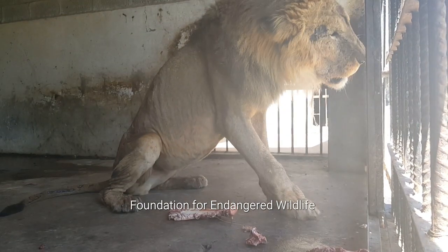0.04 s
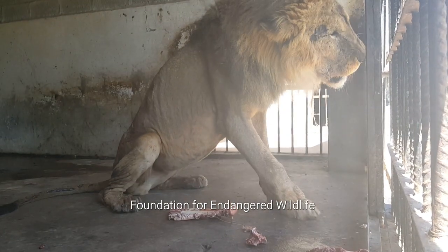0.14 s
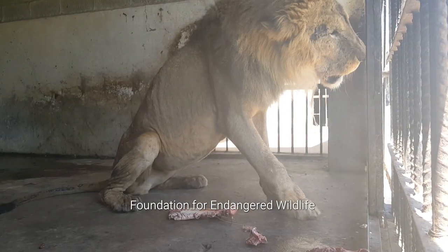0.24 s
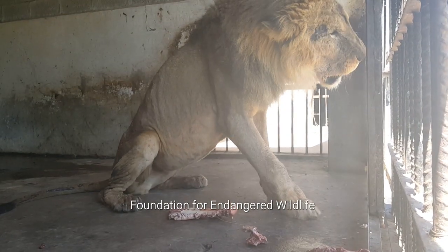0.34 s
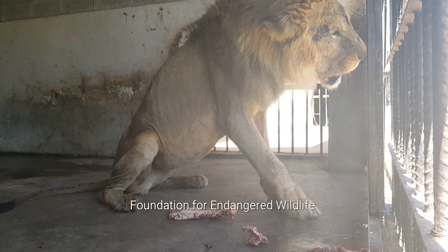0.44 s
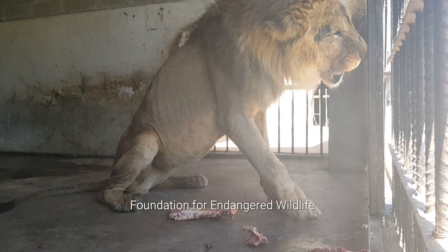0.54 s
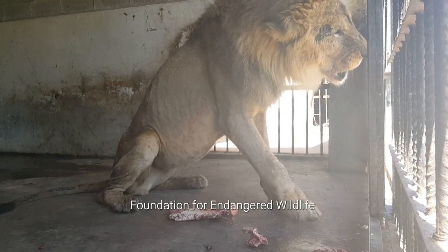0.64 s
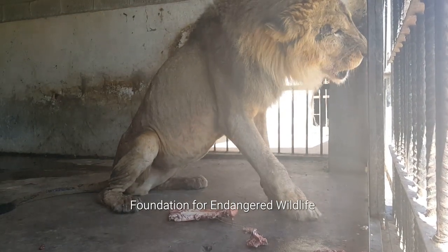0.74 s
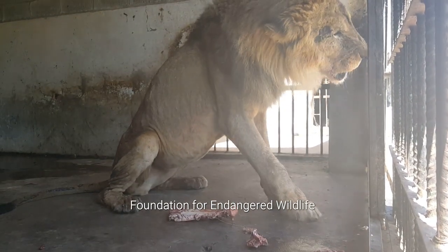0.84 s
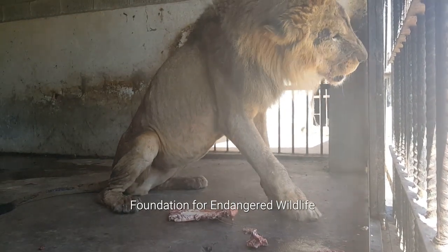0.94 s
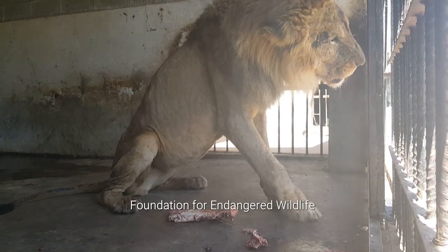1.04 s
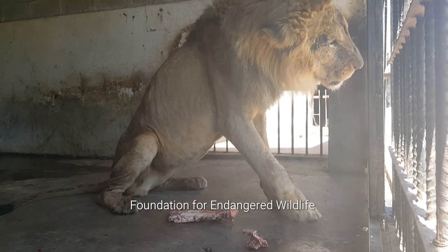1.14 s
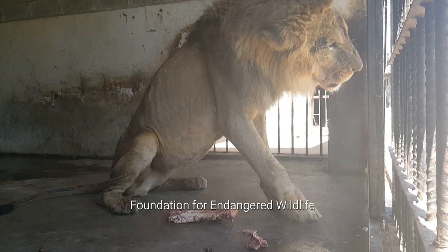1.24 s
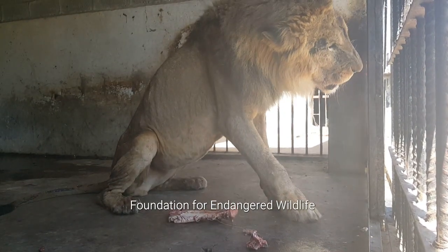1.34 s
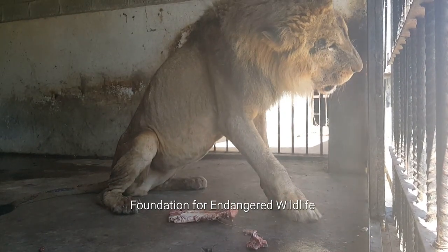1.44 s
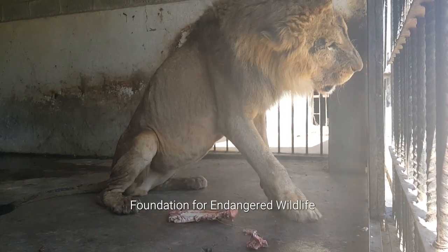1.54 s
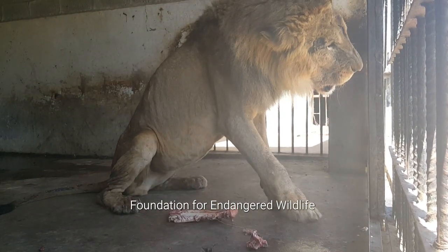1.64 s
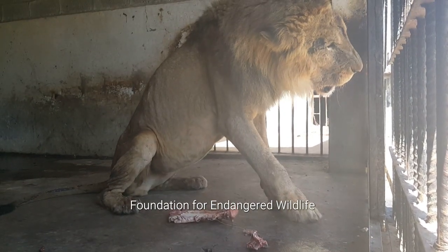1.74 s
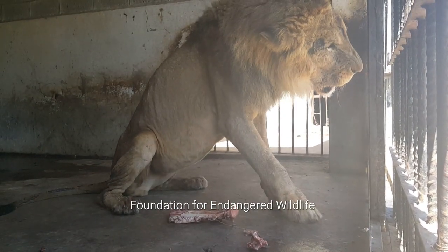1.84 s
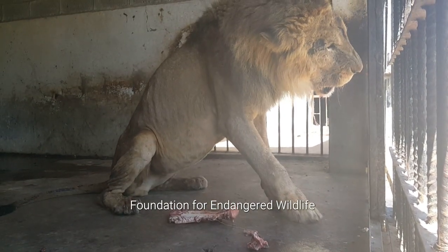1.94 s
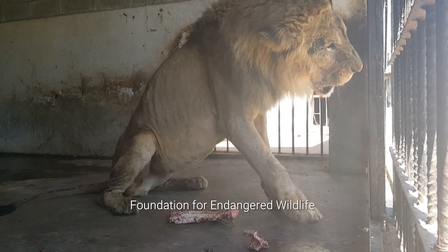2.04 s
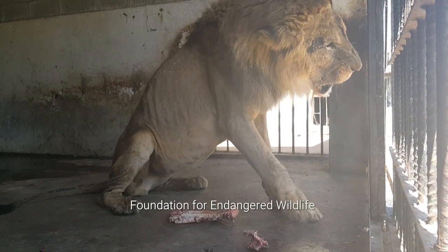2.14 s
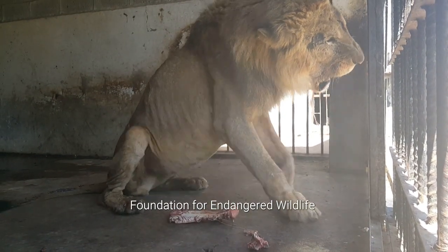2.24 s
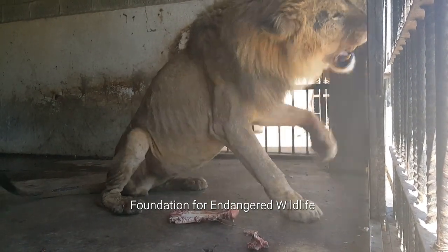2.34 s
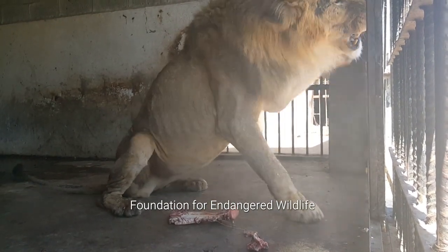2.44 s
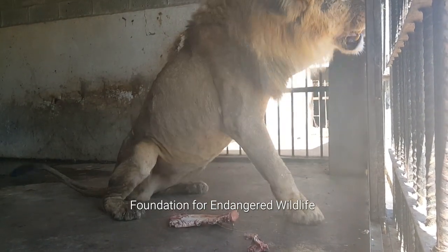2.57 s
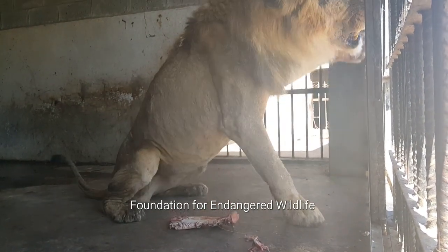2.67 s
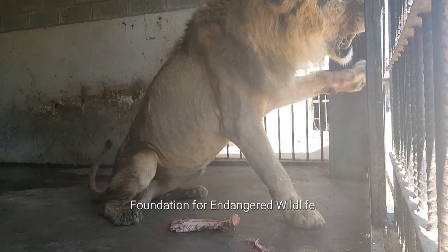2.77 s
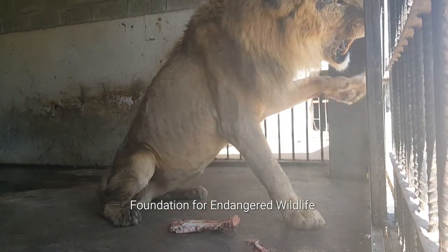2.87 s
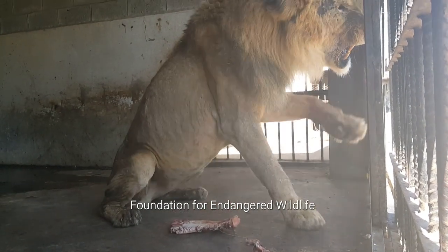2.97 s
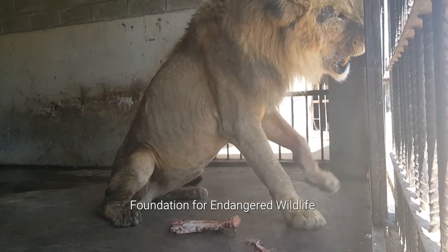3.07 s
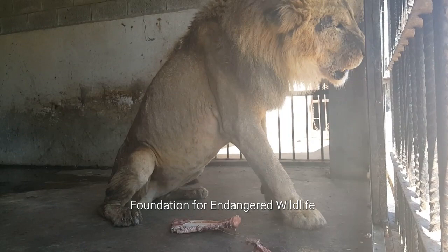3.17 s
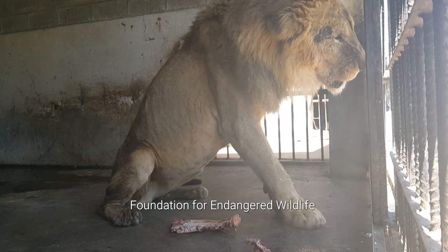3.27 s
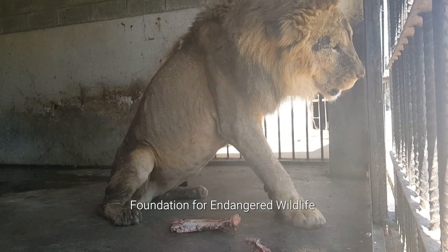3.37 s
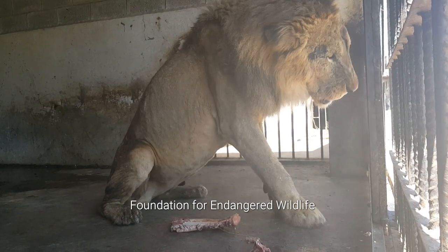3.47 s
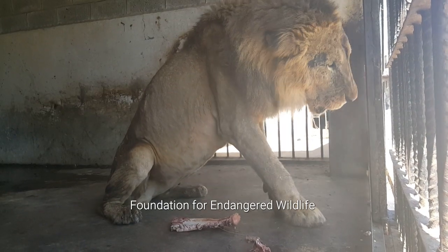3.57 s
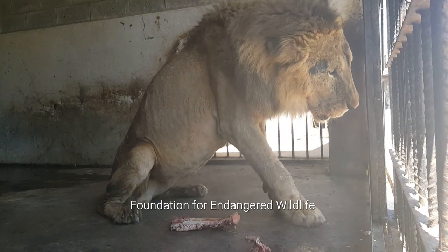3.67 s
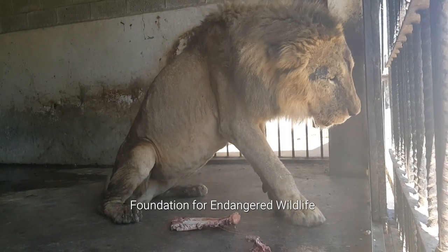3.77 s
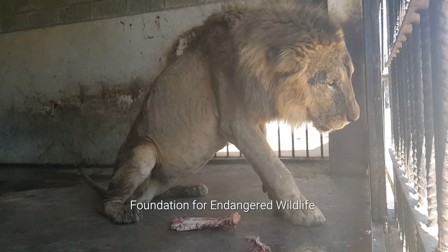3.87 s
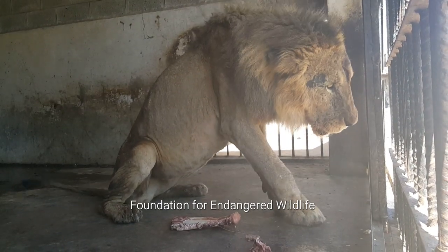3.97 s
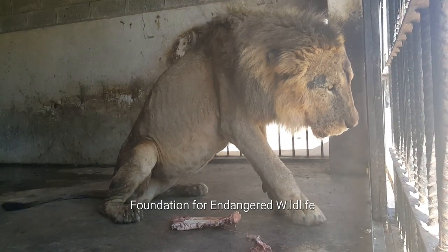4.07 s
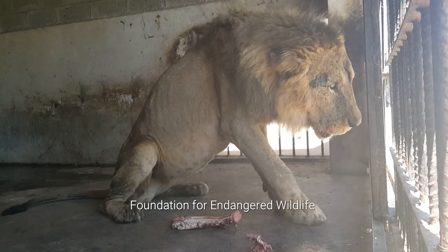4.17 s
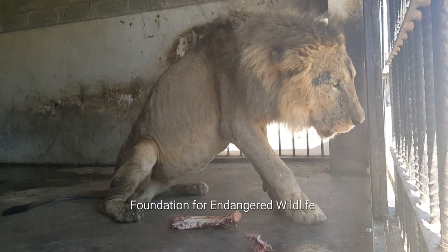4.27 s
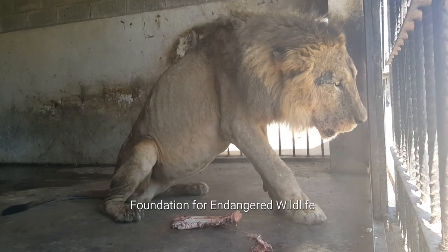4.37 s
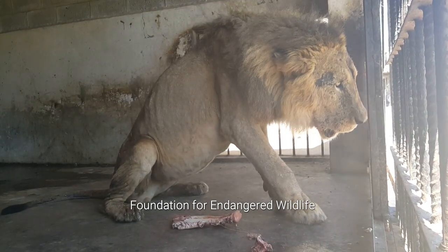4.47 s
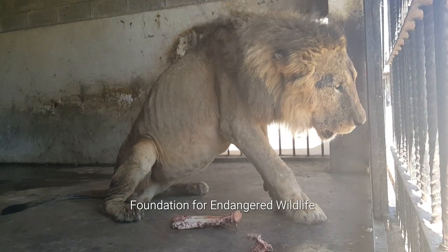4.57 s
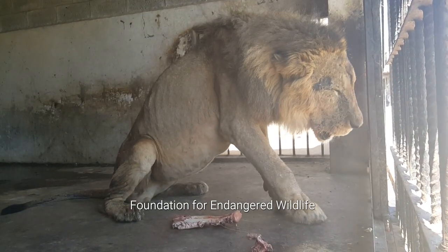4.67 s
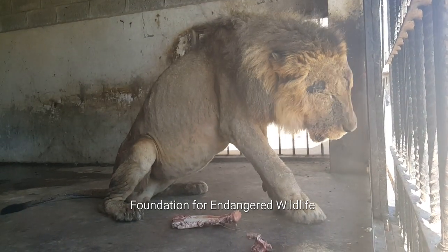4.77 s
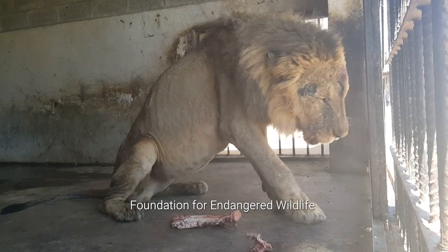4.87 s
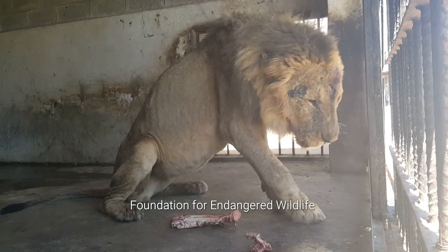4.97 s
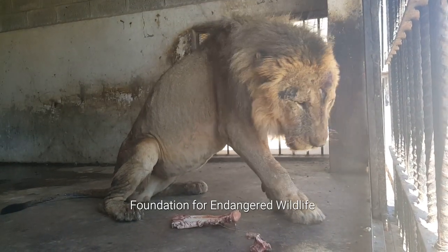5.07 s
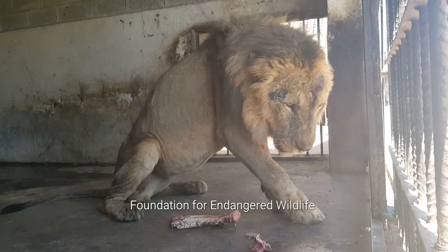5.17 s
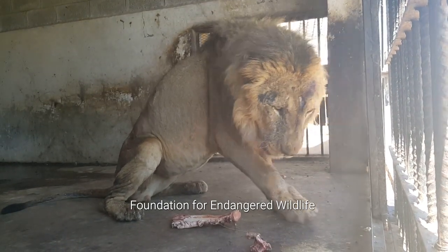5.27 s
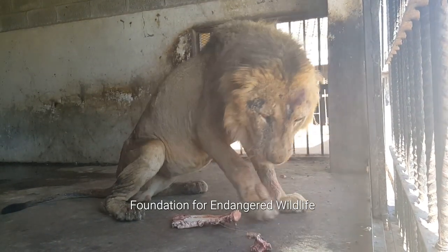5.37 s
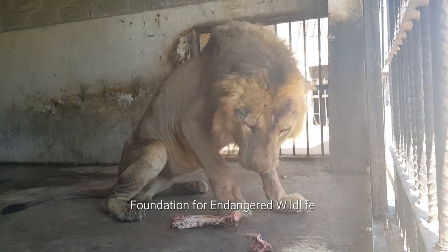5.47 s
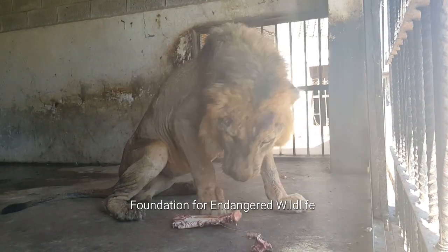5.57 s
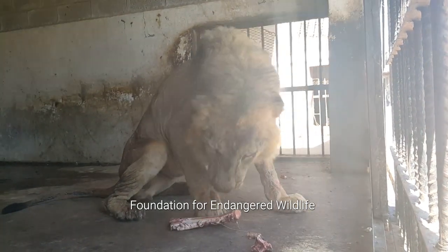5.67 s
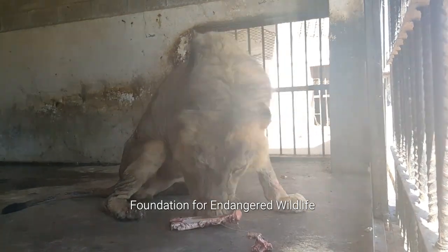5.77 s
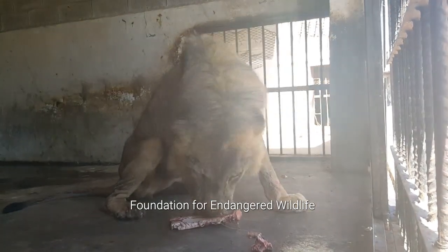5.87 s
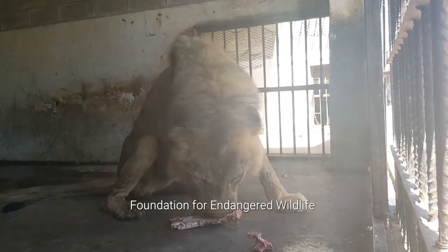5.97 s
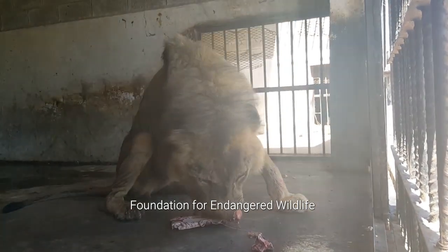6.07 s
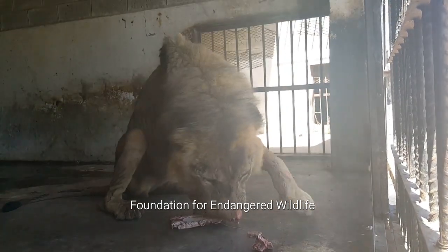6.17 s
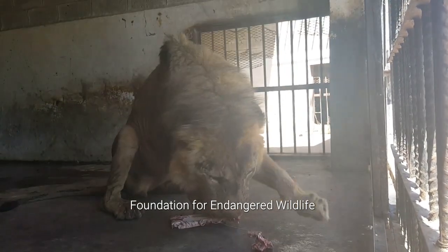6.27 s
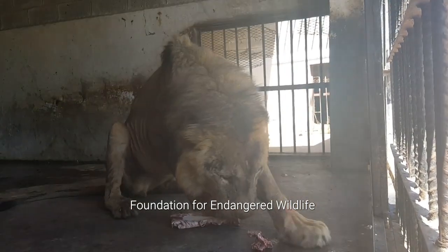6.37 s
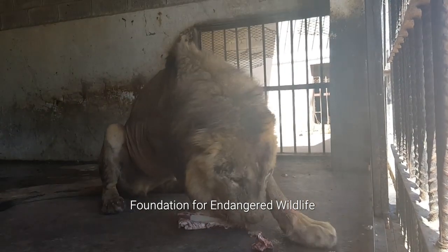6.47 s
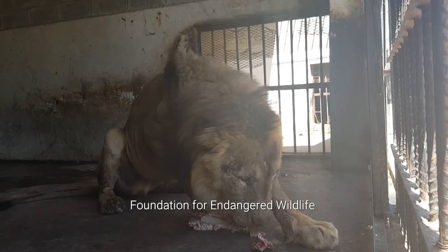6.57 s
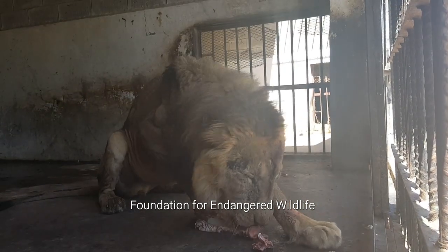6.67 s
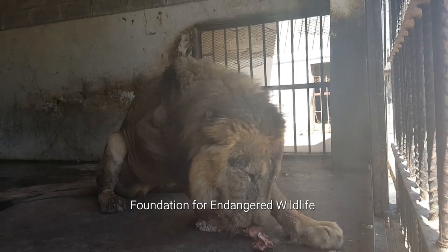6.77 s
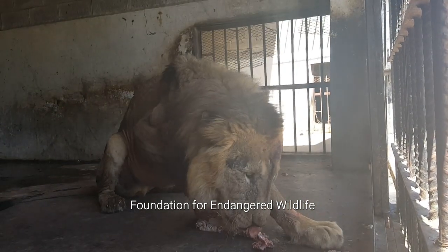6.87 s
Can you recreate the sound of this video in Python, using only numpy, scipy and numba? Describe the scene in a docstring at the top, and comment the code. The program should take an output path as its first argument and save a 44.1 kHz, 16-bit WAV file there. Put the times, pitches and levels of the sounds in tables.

```python
"""A low outdoor murmur is heard first and runs throughout; over it a lion, a couple of metres away, roars four
times in a small concrete cell. Its slack vocal folds slap about 17 to 46 times a second, and slaps and rushing
air ring chest, throat and mouth. Air swells once in every roar, the chest resonance sinks, and a smooth moan
appears inside the third roar. Sharp hisses are bursts of shaped noise, dry ticks are short grains of noise with a
brief ring, and a huff leads into the second roar. The cell adds standing waves, hard reflections and a tail."""
import sys
import numpy as np
from scipy import signal
from scipy.fft import rfft, irfft
from scipy.io import wavfile
from scipy.ndimage import uniform_filter1d
from numba import njit

SR = 44100
rng = np.random.default_rng(int(sys.argv[2]) if len(sys.argv) > 2 else 0)


def waveform_to_disk(signal):
    """Save audio, clipped to [-1, 1], as 16-bit WAV at the path in sys.argv[1]."""
    frames = np.transpose(np.atleast_2d(signal))
    scaled = np.clip(frames, -1, 1) * 32767
    samples = np.round(scaled).astype(np.int16)
    wavfile.write(sys.argv[1], SR, samples)


N = 304788  # length in samples


def undb(db):
    """Turn decibels into gain."""
    return 10 ** (np.asarray(db) / 20)


def clock():
    """Time of every sample in seconds."""
    return np.arange(N) / SR


def curves(rows):
    """Join each column of a table by straight lines in time; the first column is the time."""
    s, *columns = np.transpose(rows)
    return [np.interp(clock(), s, column) for column in columns]


def ramp(age, length_s):
    """Rise from 0 to 1 in length_s."""
    return np.clip(age / length_s, 0, 1)


def unit(x):
    """Scale to rms 1."""
    return x / np.sqrt(np.mean(x ** 2))


def steady(x, size=2600):
    """Hold the rms near 1 over a few slaps, leaving the single slaps standing."""
    power = uniform_filter1d(uniform_filter1d(x ** 2, size), size)
    floor = 1e-5 * np.mean(x ** 2)  # keeps silence from being blown up
    return x / np.sqrt(np.abs(power) + floor)


def pan(x, db):
    """Place a sound by its left minus right level."""
    return x * undb(np.array([[db], [-db]]) / 2)


def walk(rate, count=2000):
    """Slow chance: random levels, rate of them a second, joined by lines and scaled to rms 1."""
    return unit(np.interp(clock() * rate, np.arange(count), rng.standard_normal(count)))


def colour(x, points):
    """Give a sound a spectrum of (Hz, dB) points."""
    hz, db = np.transpose(points)
    f = np.fft.rfftfreq(x.shape[-1], 1 / SR)
    gain = undb(np.interp(np.log(f + 1), np.log(hz), db))
    return irfft(rfft(x) * gain, x.shape[-1])


@njit
def svf(x, hz, width):
    """State-variable band-pass with a moving centre, gain 1 there."""
    y, b, l = np.empty(len(x)), 0., 0.
    for i in range(len(x)):
        g, k = np.tan(np.pi * hz[i] / SR), width / hz[i]
        v = (b + g * (x[i] + 1e-18 - l)) / (1 + g * (g + k))
        b, l, y[i] = 2 * v - b, l + 2 * g * v, k * v
    return y


def ring(x, hz, width_hz, order=1):
    """A resonance; applied several times it has steeper skirts."""
    for _ in range(order):
        x = svf(x, hz + np.zeros(len(x)), float(width_hz))
    return x


def muffle(x, hz, order=6):
    """A low-pass: the part above hz is swallowed, as by soft tissue."""
    return signal.sosfilt(signal.butter(order, hz, fs=SR, output="sos"), x)


# Colour of the outdoor murmur. Each row: pitch in Hz, level in dB.
MURMUR_COLOUR = [(15, -55.5), (25, -12), (53, -22), (71, 4.5), (222, 0.5), (297, -2.5), (349, -4),
                 (455, -2.5), (520, -12), (627, -11), (840, -17.5), (1220, -19), (2940, -32), (4620, -36),
                 (9500, -44.5), (14500, -53)]
MURMUR_DB = -41.5  # rms of the part that both sides share


def ambience():
    """A low outdoor murmur of air through the bars, all the way through; the bass is nearly alike on both sides."""
    mid, side = colour(rng.standard_normal((2, N)), MURMUR_COLOUR) * undb(1.0 * walk(6.3))
    side = colour(side, [(100, -18.5), (500, -3.0), (2000, 0.5)])
    return (mid + side * np.array([[1], [-1]])) * undb(MURMUR_DB) / np.std(mid)


# Standing waves of the cell. Each row: pitch in Hz, width in Hz, level in dB.
STANDING_WAVES = [(77.5, 11.4, 4), (124.6, 6.3, 5.5), (212, 25, 3.5), (403.6, 7.9, 6.5), (539, 7, 0.5)]
# First reflections. Each row: delay to the left port in s, delay to the right port in s, gain.
REFLECTIONS = [(.0031, .0033, .3), (.0071, .0068, .33), (.0129, .0133, .22)]
# Colour of the diffuse tail, before its overall level. Each row: pitch in Hz, level in dB.
REVERB_COLOUR = [(100, 3.5), (250, 7.5), (500, 14), (1200, 5), (3000, 5), (9000, 5.5), (15000, -49)]


def cell(dry, t60_s=0.54, tail_db=-3.5):
    """Bare concrete: standing waves, a few hard reflections and a diffuse tail with lows nearly alike on both sides."""
    t = np.arange(SR) / SR
    mid, side = rng.standard_normal((2, SR))
    side = colour(side, [(120, -10.0), (280, -23.0), (600, -1.5)])
    tail = mid + side * np.array([[1], [-1]])
    fade = undb(-60 * t / t60_s) * (1 - np.exp(-t / 0.0016))
    tail = unit(tail * fade) / np.sqrt(SR)
    response = colour(tail, REVERB_COLOUR) * undb(tail_db) * (t < .9)
    direct = np.eye(1, SR)[0]  # a single click at time 0
    response += direct + sum(undb(db) * ring(direct, hz, width) for hz, width, db in STANDING_WAVES)
    for left, right, gain in REFLECTIONS:
        response[[0, 1], [int(left * SR), int(right * SR)]] += gain
    return signal.fftconvolve(dry, response, axes=1)[:, :N]


# Dry ticks of the jaws, claws and around the bone.
# Each row: start in s, relative level in dB, left minus right in dB.
TICK_TIMES = [(2.021, -42, -10), (2.251, -38, -9), (2.285, -33, -10), (2.328, -35, -7),
              (6.0947, -25.5, -10.5), (6.1228, -38.5, -1.5), (6.1449, -35.5, -5.5), (6.158, -39, 0),
              (6.173, -41, 3), (6.2487, -41.5, -6.5), (6.2722, -27.5, -5)]
# Short ring of every tick. Each row: pitch in Hz, width in Hz, level in dB.
TICK_RINGS = [(1950, 300, 8.5), (2314, 1130, 14.5), (2750, 540, 8.5), (3440, 2040, 7), (4700, 2300, -4.5)]


def ticks(scrape_s=0.0017):
    """Hard, gritty little contacts: quickly fading noise with a very short ring."""
    out, t, grit = 0, clock(), rng.standard_normal(N)
    for s, db, pan_db in TICK_TIMES:
        tap = grit * np.exp(-np.abs(t - s) / scrape_s) * (t >= s)
        out = out + pan(tap * undb(db + 4.5), pan_db)
    rung = np.array([sum(undb(db) * ring(side, hz, width, order=3) for hz, width, db in TICK_RINGS)
                     for side in out])
    return muffle(rung, 5500, order=3)


# Sharp bursts of hiss. Each row: start in s, level of the first spit in dB, left minus right in dB,
# level of the hiss after it in dB, length of that hiss in s.
HISS_BURSTS = [(2.371, -29, -6, -50, 0.15), (2.584, -22.5, -8, -40.5, 0.023),
               (3.917, -58, -1.5, -39.5, 0.11), (4.104, -34, -1.5, -41.5, 0.13),
               (4.462, -44, -12, -68, 0.068), (4.527, -44.5, -1.5, -49.5, 0.16),
               (5.076, -35, -1, -45.5, 0.17)]
# Colour of the bursts, before the top is softened. Each row: pitch in Hz, level in dB.
HISS_SPECTRUM = [(880, -8), (1500, -5.5), (2070, -4), (3460, -11), (4340, -7.5), (6660, -19), (8770, -19),
                 (10100, -30), (14500, -29)]


def hisses():
    """Each burst of noise spits once, then hisses on and dies."""
    out, t = 0, clock()
    noise = colour(rng.standard_normal(N), HISS_SPECTRUM)
    noise = unit(colour(noise, [(9500, 0), (13000, -8)])) * undb(1.5 * walk(120))
    for s, spit_db, pan_db, hiss_db, length in HISS_BURSTS:
        age = np.maximum(t - s, 0)
        shape = undb(spit_db) * np.exp(-age / 0.004) + undb(hiss_db) * np.exp(-(age / length) ** 2)
        out = out + pan(noise * shape * (t >= s), pan_db)
    return out


def huff(peak_s=2.26, rise_s=0.091, throat_db=-42, mouth_db=-45, hiss_db=-47):
    """Air hisses through the opening jaws; just before the second roar, throat and mouth join in."""
    air = rng.standard_normal(N) * undb(2.5 * walk(60))
    early = peak_s - clock()
    swell = np.exp(-np.maximum(early, 0) / rise_s) * (1 + early / 0.87).clip(0, 1)
    throat = undb(throat_db) * unit(ring(air, 450, 330, order=2))
    mouth = undb(mouth_db) * unit(ring(air, 1350, 580, order=2))
    hiss = unit(colour(air, [(1000, -36), (2500, -19), (5000, -11.0), (7000, -21), (14000, -31.5)]))
    return (throat + mouth) * swell ** 2 + undb(hiss_db) * hiss * swell


# Slap rate of the vocal folds, one list per roar, from its start to its end.
# Each row: time in s, slaps per second.
SLAP_RATES = [
    [(.438, 45.8), (.47, 40.7), (.55, 31), (.98, 29.1), (1.08, 24.8), (1.36, 23.7), (1.48, 17.5),
     (1.62, 26)],
    [(2.363, 42.3), (2.42, 43.2), (2.6, 37), (2.87, 35.9), (3.13, 27.6), (3.27, 31.3), (3.39, 26.3),
     (3.53, 28.7), (3.65, 26.3), (3.74, 29.3), (4.0, 28.2), (4.09, 20.5), (4.3, 21.3)],
    [(4.737, 27.8), (4.8, 29.4), (4.95, 33.1), (5.18, 26.6), (5.26, 33.2), (5.58, 28.9), (5.7, 26.3),
     (5.86, 30)],
    [(6.188, 31.2), (6.26, 35.9), (6.44, 36.4), (6.61, 30), (6.69, 32), (6.77, 27.8), (7.0, 34)],
]


def folds(jitter_s=.0003, scatter_db=3.0):
    """Uneven slaps of the vocal folds at a changing rate, and soft rebounds between them."""
    t, slaps, rebounds = clock(), np.zeros(N), np.zeros(N)
    for roar in SLAP_RATES:
        (rate,) = curves(roar)
        cycles = np.cumsum(rate * ((t >= roar[0][0]) & (t < roar[-1][0]))) / SR
        # one slap whenever the count of cycles reaches a whole number
        at = np.searchsorted(cycles, np.arange(int(cycles[-1]) + 1), side="right").clip(0, N - 1)
        late, size, second = rng.standard_normal((len(at), 3)).T
        again = at + rng.uniform(0.217, .7, len(at)) * SR / rate[at]
        slap_at = (at + np.abs(late) * jitter_s * SR).astype(int).clip(0, N - 1)
        slaps[slap_at] = undb(scatter_db * size)
        rebounds[again.astype(int).clip(0, N - 1)] = np.abs(second)
    return slaps, rebounds


def puffs(slaps, decay_s):
    """A short puff of turbulence after every slap."""
    fading = signal.lfilter([1], [1, -np.exp(-1 / (decay_s * SR))], slaps)
    return steady(fading * rng.standard_normal(N))


def attacks(slaps):
    """What a slap sounds like before anything rings: a pressure thump and a gritty crack."""
    thump = steady(muffle(ring(slaps, 260, 840), 800, order=4))
    grit = steady(slaps) + 2 * puffs(slaps, decay_s=0.0017)
    crack = steady(muffle(ring(grit, 970, 2000, order=3), 2700))
    return thump, crack


# Snarls of air through bared teeth. Each row: peak time in s, rise in s, fall in s, relative level in dB.
SNARL_SWELLS = [(0.63, 0.19, 0.16, -39), (2.551, 0.11, 0.22, -32.5), (4.88, 0.066, 0.075, -51),
                (6.499, 0.088, 0.049, -38)]
GROWL_AIR, SNARL_AIR = .04, .42  # share of rushing air in the voice, 0-1, between and at the peaks of snarls


def snarls():
    """Air swells and ebbs once in every roar; gives its share of the voice and its gain."""
    t, swell, gain = clock(), 0, 0
    for peak_s, rise_s, fall_s, db in SNARL_SWELLS:
        shape = np.exp(-((t - peak_s) / np.where(t < peak_s, rise_s, fall_s)) ** 2)
        swell, gain = swell + shape, gain + undb(db) * shape
    return np.clip(GROWL_AIR + (SNARL_AIR - GROWL_AIR) * swell, 0, 1), gain


# Strain of the chest, one row per roar.
# Each row: time at full strain in s, strained chest pitch in Hz, relaxed chest pitch in Hz.
CHEST_STRAINS = [(0.072, 145, 104), (0.69, 220, 114), (0.069, 135, 127.6), (0.27, 140, 134)]
RELAX_S = 0.06  # time the chest resonance takes to sink


def strain():
    """Each roar holds the chest resonance high, then lets it sink."""
    t, starts = clock(), np.array([roar[0][0] for roar in SLAP_RATES])
    which = np.maximum(np.searchsorted(starts, t, side="right") - 1, 0)
    hold_s, strained_hz, relaxed_hz = np.array(CHEST_STRAINS)[which].T
    return strained_hz + (relaxed_hz - strained_hz) * ramp(t - starts[which] - hold_s, RELAX_S)


MOAN_PEAK_S, MOAN_HALF_LENGTH_S, MOAN_HZ = 5.125, 0.18, 86.4  # inside the third roar


def moan(pitch):
    """The folds lock into a smooth tone of three harmonics with a wavering pitch."""
    phase = 2 * np.pi * np.cumsum(pitch * (1 + 0.013 * walk(43))) / SR
    return unit(np.sin(phase) + undb(4.5) * np.sin(2 * phase) + undb(-21.5) * np.sin(3 * phase))


# Two fixed resonances beside the main one of the chest, relative to it.
# Each row: time in s, deep boom in dB, hollow overtone in dB.
CHEST_SIDES = [(.47, 3.5, 5), (.7, -10, -4), (2.5, -8.5, -39.5), (2.95, -1.5, 4), (3.2, -2.5, -14),
               (3.5, -4.5, -17), (4.15, -29.5, -26.5), (4.75, -7, -38), (5.2, 9, -20), (5.33, -23, -29),
               (6.2, -15, -15), (6.5, -9.5, -3.5), (6.75, -24, -13)]


def chest_sound(low):
    """The chest rings at its strained pitch with a boom and an overtone; the moan replaces it for a moment."""
    boom_db, hollow_db = curves(CHEST_SIDES)
    main = ring(low, strain(), 92.0, order=2)
    boom = undb(boom_db) * ring(low, 91.4, 80, order=2)
    hollow = undb(hollow_db) * ring(low, 210.3, 44, order=2)
    no_rumble = signal.butter(3, 55, "high", fs=SR, output="sos")
    chest = steady(signal.sosfilt(no_rumble, main + boom + hollow))
    smooth = np.clip(1 - ((clock() - MOAN_PEAK_S) / MOAN_HALF_LENGTH_S) ** 2, 0, 1)
    return np.sqrt(1 - smooth) * chest + np.sqrt(smooth) * undb(-0.5) * moan(MOAN_HZ)


# The two throat resonances, moved by tongue and jaw.
# Each row: time in s, lower pitch in Hz, upper pitch in Hz, upper over lower in dB.
THROAT_SHAPES = [(.45, 428, 574, -9), (.56, 408, 597, -3), (1.2, 407, 549, -14), (2.4, 420, 615, -4.5),
                 (2.72, 354, 446, -2.5), (2.95, 377, 586, -2), (3.3, 405, 515, -5), (3.55, 391, 530, -4.5),
                 (3.8, 399, 510, 0.5), (4.04, 390, 452, -3.5), (4.78, 415.5, 536, -5),
                 (4.95, 427, 536, -10), (5.35, 340, 463, -10.5), (6.5, 340, 441, -0.5)]
THROAT_FLUTTER = .13  # pitch shake as a share of the pitch, scaled by the air share and the chest gain


def throat_sound(low, air, chest_db):
    """Two moving throat resonances, shaken by rushing air and muffled by soft tissue."""
    lower_hz, upper_hz, upper_db = curves(THROAT_SHAPES)
    depth = THROAT_FLUTTER * air * undb(chest_db - chest_db.max())
    lower_hz, upper_hz = (hz * (1 + depth * walk(60)) for hz in (lower_hz, upper_hz))
    lower = ring(low, lower_hz, 135, order=2)
    upper = undb(upper_db) * ring(low, upper_hz, 80, order=2)
    return muffle(steady(lower + upper), 768)


def mouth_sound(high, mouth_hz, lips_hz, lips_db):
    """The mouth and the lips ring as two moving resonances."""
    mouth = ring(high, mouth_hz, 160, order=2)
    lips = undb(lips_db) * ring(high, lips_hz, 230, order=2)
    return steady(muffle(mouth + lips, 2070))


def rasp_sound(high, wind, air, teeth_hz):
    """Air rasps past the teeth; through a wide-open mouth it also rushes as a broad hiss."""
    teeth = ring(high, teeth_hz * (1 + 0.022 * walk(25)), 560, order=3)
    above = undb(-16.5) * ring(high, 1.78 * teeth_hz, 2100, order=3)
    rush = unit(colour(wind, [(900, -31.0), (1500, 5.0), (2300, 1), (3300, -8.5), (5000, -13.5),
                              (9000, -20.5), (11000, -44)]))
    return steady(steady(teeth + above) + 9 * (air - GROWL_AIR) * rush)


# Narrow, whistling resonances of the airway. Each row: start in s, length in s, pitch in Hz, relative level in dB.
WHISTLE_NOTES = [(0.945, 0.15, 1164, -44.5), (1.335, 0.16, 1156, -54.5), (2.59, 0.13, 1070, -37),
                 (2.788, 0.21, 1187, -29), (3.686, 0.56, 863, -43), (5.279, 0.37, 882, -46)]
WHISTLE_EDGE_S, WHISTLE_FADE_DB_PER_S = 0.019, 29.5


def whistles(breath, width_hz=44):
    """The slaps and air set a narrow passage singing for a moment; it fades."""
    out, t = 0, clock()
    for start, length, hz, db in WHISTLE_NOTES:
        age = np.clip(t - start, 0, length)
        shape = ramp(age, WHISTLE_EDGE_S) * ramp(length - age, WHISTLE_EDGE_S)
        gain = undb(db + 6.5 - WHISTLE_FADE_DB_PER_S * age)
        out = out + steady(ring(breath, hz, width_hz, order=2)) * shape * gain
    return out


# Single slaps that stand out of the rattle.
# Each row: time in s, relative level of the thump in dB, relative level of the knock in the mouth in dB.
SLAMS = [(0.4384, -14, -22), (0.4685, -7.5, -29), (0.4835, -14.5, -15), (1.088, -28, -38),
         (1.421, -28, -41), (2.387, -10, -21), (2.4101, -2.5, -19.5), (2.4554, -11, -10),
         (2.4798, -8, -9.5), (2.528, -5.5, -11.5), (2.692, -13.5, -14.5), (2.718, -15, -20),
         (2.798, -11, -17.5), (2.909, -8.5, -18), (2.970, -17, -17), (3.003, -21, -19),
         (3.2442, -25.5, -21), (3.341, -21.5, -19), (3.452, -20.5, -20.5), (3.486, -24.5, -17.5),
         (3.523, -21.5, -15.5), (3.558, -19, -16.5), (3.631, -19, -20.5), (3.667, -14.5, -21),
         (4.737, -17.5, -27.5), (4.7725, -15.5, -26), (5.33, -26, -33), (5.3605, -35.5, -28),
         (6.2182, -23.5, -37.5), (6.303, -19, -34), (6.332, -30.5, -32), (6.442, -25.5, -27),
         (6.471, -21.5, -20), (6.4823, -29.5, -21.5), (6.499, -28, -22), (6.623, -21.5, -24.5),
         (6.654, -20, -32.5), (6.719, -30, -31.5), (6.79, -30, -26)]


def hard_slaps(mouth_hz, lips_hz, teeth_hz):
    """Now and then the folds slam shut: one clean pressure spike, and a knock that rings the mouth."""
    s, thump_db, knock_db = np.transpose(SLAMS)
    spikes, knocks, at = np.zeros(N), np.zeros(N), (s * SR).astype(int)
    spikes[at], knocks[at] = undb(thump_db), undb(knock_db)
    thump = muffle(ring(spikes, 290, 750, order=2), 850, order=3)
    knock = (ring(knocks, mouth_hz, 165, order=2) + undb(-4.5) * ring(knocks, lips_hz, 280, order=2)
             + undb(-23) * ring(knocks, teeth_hz, 700, order=2)
             + undb(-21.5) * ring(knocks, 1300, 2500, order=2))
    knock = muffle(knock, 3000, order=4)
    # the filters lower the peaks; bring the loudest back up
    thump = thump * spikes.max() / np.abs(thump).max() * undb(-2.5)
    return thump + knock * knocks.max() / np.abs(knock).max() * 1.6


def closure(lead_s=.004, length_s=.009, depth=.75):
    """Around a hard slap the folds stay shut while the pressure builds, and the upper rattle dips."""
    t = clock()
    shut = sum(np.exp(-((t - s + lead_s) / length_s) ** 2) for s, _, _ in SLAMS)
    return 1 - depth * shut.clip(0, 1)


# Levels of the three main resonances, one list per roar.
# Each row: time in s, then relative levels of chest, throat and mouth in dB.
VOICE_LEVELS = [
    [(.44, -25.5, -12.5, -28.5), (.49, -22.5, -15.5, -28), (.56, -34.5, -29.5, -37), (.69, -33, -37, -38.5),
     (.85, -24.5, -52, -50), (1.0, -26, -34.5, -46), (1.2, -31.5, -40.5, -54), (1.48, -33.5, -34, -54.5),
     (1.6, -50, -71, -97)],
    [(2.36, -11.5, -20, -25), (2.39, -14, -24.5, -19.5), (2.52, -8, -23.5, -28), (2.72, -15.5, -21.5, -27),
     (2.85, -19, -20, -23.5), (3.0, -26.5, -19, -26), (3.15, -30, -37, -41), (3.24, -31, -29, -25.5),
     (3.35, -33, -23.5, -39.5), (3.44, -19.5, -25, -44), (3.451, -23.5, -21, -29.5),
     (3.56, -23, -17.5, -28), (3.76, -23, -18, -31), (4.04, -21, -29, -42), (4.16, -43, -33.5, -51),
     (4.28, -31, -50, -68)],
    [(4.74, -22.5, -16.5, -38.5), (4.78, -21.5, -10.5, -26.5), (4.81, -22.5, -25.5, -28.5),
     (4.88, -25, -26, -40.5), (4.96, -24, -36.5, -42.5), (5.06, -16.5, -46, -55.5), (5.28, -22, -40, -54.5),
     (5.34, -19, -48.5, -39.5), (5.52, -25, -45, -46), (5.64, -22, -57, -48.5), (5.77, -30.5, -73, -57),
     (5.84, -33, -48, -59)],
    [(6.19, -23, -55, -58.5), (6.23, -16, -51, -43.5), (6.27, -26, -42, -67.5), (6.31, -16.5, -43, -44),
     (6.38, -20.5, -43, -48), (6.44, -12.5, -35.5, -35), (6.48, -15.5, -28.5, -34), (6.6, -14.5, -50, -36),
     (6.78, -14, -49, -45), (6.89, -23.5, -43, -55)],
]
# Upper resonances, moved by lips and tongue.
# Each row: time in s, then pitches of mouth, lips and teeth in Hz, lips over mouth in dB.
MOUTH_SHAPES = [(.44, 1170, 1234, 2900, -14), (.48, 1250, 1400, 3050, -10), (.52, 1250, 1600, 2800, -4),
                (.66, 1535, 1640, 2200, -0.5), (.82, 1070, 1420, 2500, -10.5), (1.5, 1286, 1560, 2840, -11),
                (2.37, 1076, 1390, 2400, -8.5), (2.7, 1107, 1310, 2250, -11), (2.9, 1164, 1660, 2480, -14),
                (3.05, 1215, 1695, 2650, -9.5), (3.24, 1232, 1324, 2550, -8), (3.52, 1197, 1313, 2790, -1),
                (3.8, 1126, 1268, 3140, -2), (4.15, 1050, 1530, 3200, 3.5), (4.75, 1160, 1430, 3100, 2),
                (4.83, 1510, 1760, 3200, -5), (4.95, 1460, 1960, 2140, 3.5), (5.33, 1080, 1336, 2450, 0.5),
                (5.8, 1126, 1350, 2180, -6), (6.2, 986, 1400, 2530, 11.5), (6.34, 1030, 1390, 2490, -4),
                (6.46, 1115, 1460, 2400, -23.5), (6.6, 1083, 1290, 2480, -17.5),
                (6.88, 1114, 1210, 2280, -9)]
# Edge of the voice, relative to the mouth level. Each row: time in s, dry crack of each slap in dB,
# rasp past the teeth in dB, torn rattle between throat and mouth in dB.
VOICE_EDGE = [(.45, -39, -3.5, -1), (.55, -10, -6, -21), (.7, -0.5, -8.5, -12), (1.3, -16, -12, -26),
              (2.4, -10.5, -20, -10), (2.5, -2, -14.5, -11.5), (2.7, -9.5, -20, -4), (2.8, -16, -18, -18),
              (2.87, -8, -11, -21), (2.98, -14, -14, -19), (3.1, -19, -12, -11), (3.25, -13, -13.5, -24),
              (3.42, -14, -7.5, -16), (3.46, -16.5, -9, -29), (3.55, -21, -11, -14),
              (3.64, -16, -15.5, -20), (3.8, -9, -11, -13.5), (4.74, 0, -3.5, -22), (4.82, -11.5, -3, -26),
              (5.26, 2, 10, -11), (5.335, 2, 6, -15), (5.39, -4.5, -2.5, -24), (5.8, -6, -7, -18),
              (6.3, -1.5, 1.5, -8.5), (6.5, -7.5, -1, -25), (6.8, -8.5, -17, -16)]
TORN_HZ, TORN_WIDTH_HZ = 694, 360
THUMP_DB = -13.5  # the bare pressure pulse of each slap, relative to the throat level


def lion():
    """Slaps and rushing air ring the resonances of chest, throat and mouth."""
    t, (slaps, rebounds) = clock(), folds()
    chest_db, throat_db, mouth_db = curves([row for roar in VOICE_LEVELS for row in roar])
    mouth_hz, lips_hz, teeth_hz, lips_db = curves(MOUTH_SHAPES)
    crack_db, rasp_db, torn_db = curves(VOICE_EDGE)
    air, snarl = snarls()
    thump, crack = attacks(slaps)
    wind = rng.standard_normal(N) * undb(0.78 * walk(70))
    # the lows come from the slaps themselves, the highs more from the air that they let through
    low = steady(slaps + .2 * rebounds) + .3 * puffs(slaps, decay_s=.008) + .5 * air * wind
    high = (1 - air) * (steady(slaps) + .8 * puffs(slaps, decay_s=.003)) + air * wind
    chest = chest_sound(low) * undb(chest_db - 9.0)
    throat = throat_sound(low, air, chest_db) * undb(throat_db - 5.5)
    mouth = mouth_sound(high, mouth_hz, lips_hz, lips_db) * undb(mouth_db)
    rasp_gain = np.hypot(undb(mouth_db + rasp_db), snarl) * undb(-2.0)
    rasp = rasp_sound(high, wind, air, teeth_hz) * rasp_gain
    torn = steady(ring(high, TORN_HZ, TORN_WIDTH_HZ, order=3)) * undb(mouth_db + torn_db)
    edge = thump * undb(throat_db + THUMP_DB) + crack * undb(mouth_db + crack_db)
    upper = throat + mouth + rasp + edge + torn
    # each roar switches on quickly and fades out at its end
    sounding = sum(ramp(t - roar[0][0] + .002, .002) * ramp(roar[-1][0] - t, .06) for roar in SLAP_RATES)
    voice = chest + (upper + whistles(high)) * closure()
    return voice * sounding + hard_slaps(mouth_hz, lips_hz, teeth_hz)


def scene():
    """The lion in the cell; two ports hear it in slightly different colours, the left one a little later."""
    voice = lion() + huff()
    left = colour(voice, [(100, 8.5), (400, -3.5), (1200, -2.0), (4000, -4.0), (8000, 2.5),
                          (11000, 9.5), (14000, -8.0)])
    right = colour(voice, [(100, 8.0), (400, -7.5), (1200, -2.5), (4000, 1.5), (8000, -4.5),
                           (11000, -1.0), (14000, 0.5)])
    left = np.pad(left, (3, 0))[:N]  # three samples later
    roars = cell(np.array([left, right]) + hisses())
    return roars + cell(ticks(), t60_s=0.69, tail_db=-10.5) + ambience()


TOP_HZ = 14900


def record(dry):
    """The recorder cuts the top with a steep low-pass."""
    return signal.sosfilt(signal.ellip(12, .2, 80, TOP_HZ, fs=SR, output="sos"), dry)


dry = scene()
out = record(dry)
waveform_to_disk(out)
```